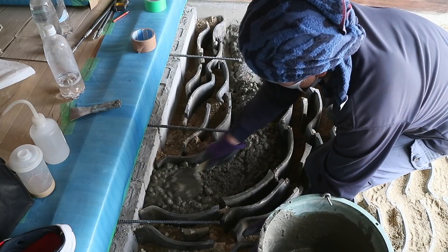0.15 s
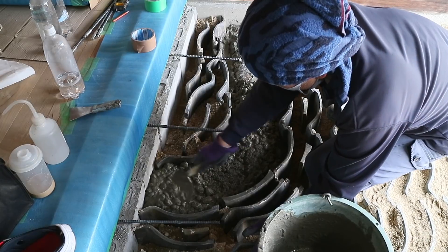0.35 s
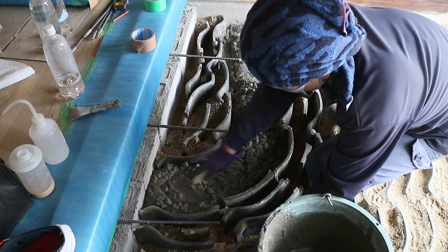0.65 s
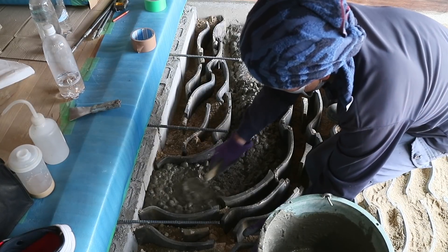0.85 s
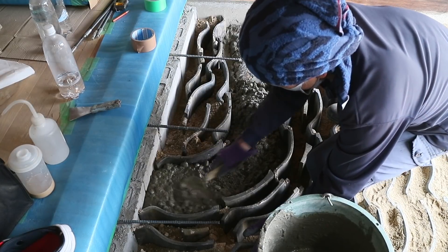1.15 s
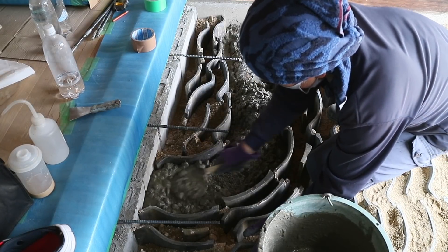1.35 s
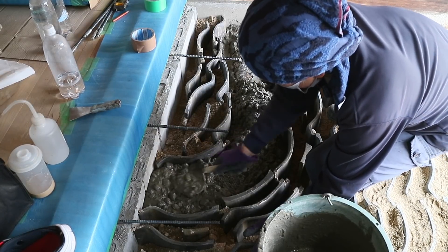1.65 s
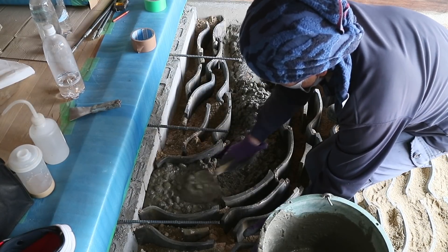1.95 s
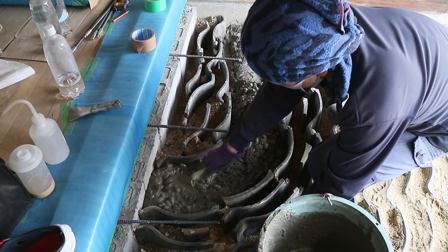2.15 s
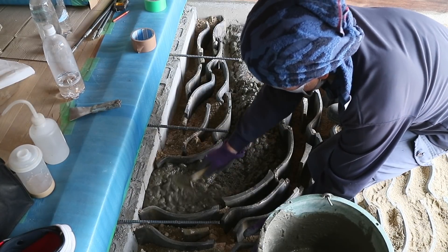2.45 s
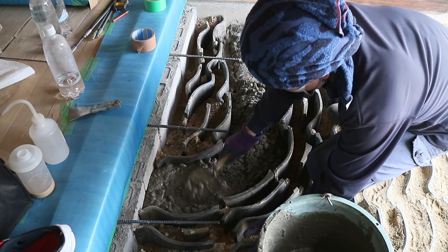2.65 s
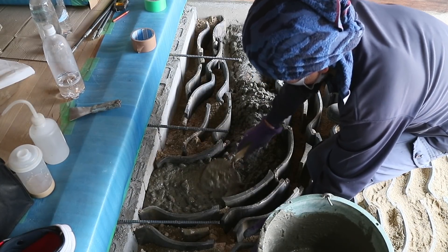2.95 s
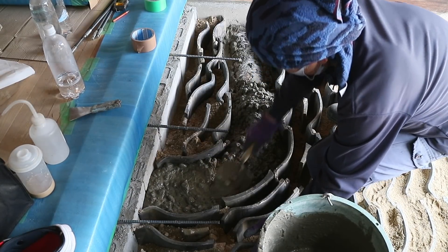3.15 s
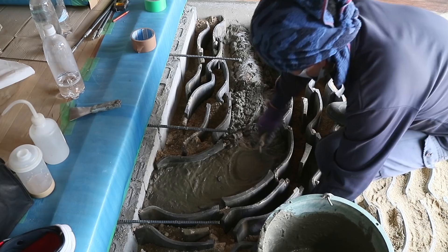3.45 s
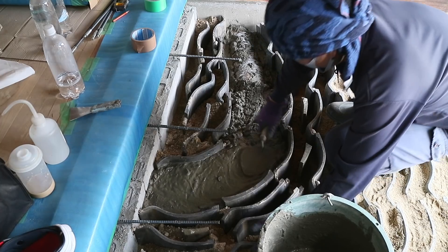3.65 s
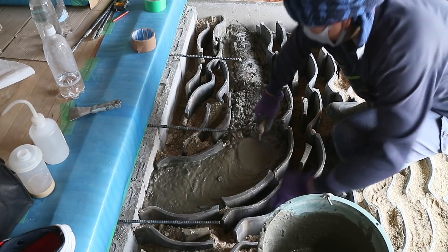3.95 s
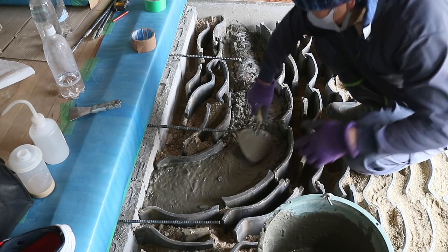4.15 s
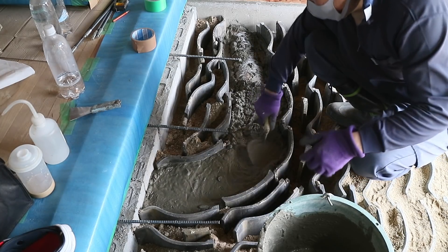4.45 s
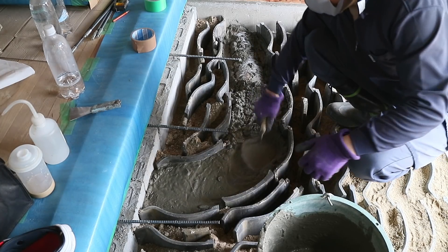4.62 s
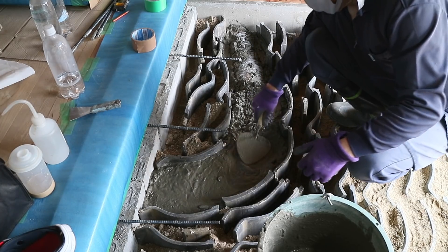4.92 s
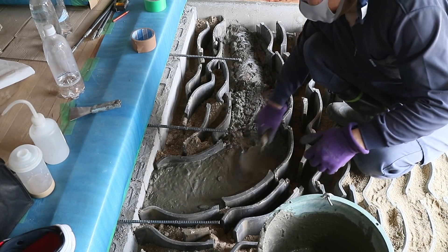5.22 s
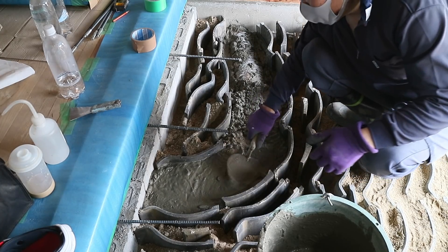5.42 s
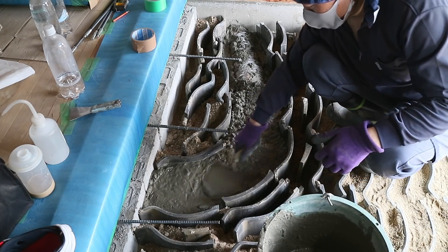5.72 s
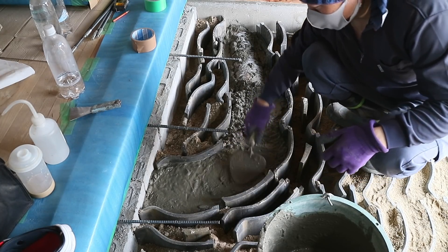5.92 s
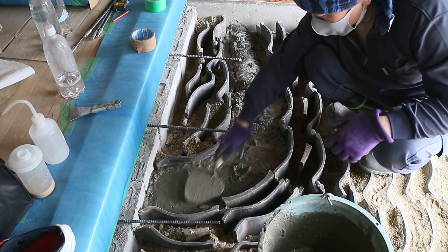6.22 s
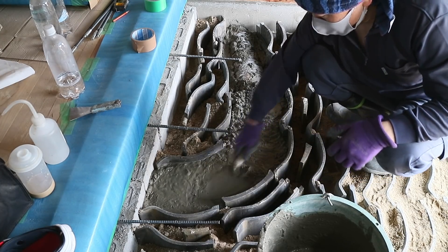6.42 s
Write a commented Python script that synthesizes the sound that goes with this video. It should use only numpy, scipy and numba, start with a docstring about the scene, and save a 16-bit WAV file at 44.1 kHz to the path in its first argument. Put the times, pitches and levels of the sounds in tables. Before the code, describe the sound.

A steel trowel works wet, sandy mortar very close to a pair of microphones. Quick irregular scrapes crunch and squelch, stones ringing against the blade, building to a dense, loud grind near three seconds. Then softer smears, a dull wet pat, near silence and a few sharp scraping catches. A faint far machine hums behind, in a dry half-open shed.

```python
"""Trowel on wet mortar

Close by, a steel trowel scrapes and pats wet, gritty cement between clay tiles in a half-open shed.
Sand grains are clumped noise ticks; they drive moving resonances for the pocket under the blade.
Filtered lumps make the mortar squelch; short decaying sines and noise make stones snag, grains snap
and lumps land. Behind it lie banded noise for the air of the site, a far machine's wavering sines,
a lumpy bass and a short noise tail for the shed, all heard through a pair of microphones."""
import sys
import numpy as np
from scipy import signal
from scipy.io import wavfile
from numba import njit

SR = 44100
rng = np.random.default_rng(int(sys.argv[2]) if len(sys.argv) > 2 else 0)


def master_out(mix):
    """Clip the mix to full scale and print it as 16-bit PCM to the path in sys.argv[1]."""
    frames = np.transpose(np.atleast_2d(mix))
    ceiling = np.clip(frames, -1, 1)
    pcm = np.round(ceiling * 32767).astype(np.int16)
    wavfile.write(sys.argv[1], SR, pcm)


N = 290178


def from_db(db):
    """Decibels to an amplitude factor."""
    return 10 ** (np.asarray(db) / 20)


def rms_one(x):
    """Scale a signal to rms 1."""
    return x / np.sqrt(np.mean(x ** 2) + 1e-20)


def at_hz(points, hz):
    """Read a spectrum table at a pitch, straight lines over log frequency."""
    points = np.array(points)
    return np.interp(np.log(hz), np.log(np.maximum(points[:, 0], 1)), points[:, 1])


def in_time(rows, axis=1):
    """Read one column of a timed table at every sample, straight lines between rows."""
    rows = np.array(rows)
    return np.interp(np.arange(N) / SR, rows[:, 0], rows[:, axis])


def filtered(x, order, hz, kind):
    """Butterworth filter along the last axis."""
    return signal.sosfilt(signal.butter(order, hz, kind, fs=SR, output="sos"), x)


def drift(rate):
    """Slow chance of spread 1: noise through two equal low-pass poles at rate (Hz)."""
    r = np.exp(-80 * np.pi * rate / SR)  # computed at every 40th sample
    slow = signal.lfilter([1], [1, -2 * r, r * r], rng.standard_normal(N // 40 + 2002))[2000:]
    return np.interp(np.arange(N) / 40, np.arange(len(slow)), rms_one(slow))


def random_moments(per_s, chances):
    """Random sample positions, with independent chances of 0 to 1 for each."""
    when, *rest = rng.random((int(per_s * N / SR), 1 + chances)).T
    return (when * (N - 1)).astype(int), *rest


def ring(clicks, hz, t60):
    """A unit click sets a two-pole resonance ringing as a sine of height 1."""
    r, w = np.exp(-np.log(1000) / (t60 * SR)), 2 * np.pi * hz / SR
    return signal.lfilter([0, np.sin(w)], [1, -2 * r * np.cos(w), r * r], clicks + 1e-18)


def grains(per_s, spread_db, clump_db):
    """Two trains of random ticks of uneven size that come in clumps; rms 1."""
    sizes = from_db(spread_db * np.minimum(rng.exponential(1, (2, N)), 5)) * rng.choice([-1, 1], (2, N))
    struck = rng.random((2, N)) < per_s / SR
    return rms_one(sizes * struck * from_db(clump_db * drift(39)))


def colour(pair, spectrum, side, patchy_db):
    """Bands 0.45 octave wide, each with its level, flicker and width; the pair gives mid and side."""
    out, edges = 0, 25 * 2 ** np.arange(0, 9.6, .45)
    for k, (low, high) in enumerate(zip(edges, edges[1:])):
        hz = np.sqrt(low * high)
        if hz > spectrum[0][0]:
            mid, wide = filtered(pair, 2, [low, high], "band")
            gain = from_db(at_hz(spectrum, hz) + patchy_db * drift(17.0)) * (-1) ** k
            out = out + gain * (mid + from_db(at_hz(side, hz)) * wide * [[1], [-1]])
    return out / np.sqrt(np.mean(out.mean(axis=0) ** 2))


# Relative density of the air of the site: pitch_hz, level_db (per Hz)
AIR_SPECTRUM = [(15, -43.5), (40, 7), (65, -6.5), (110, -2.5), (160, -15.5), (225, -6.5), (460, -5),
                (892, -10), (1100, -7), (1730, -16), (3730, -16), (7610, -29.5), (11300, -36.5),
                (14000, -53)]
# Stereo width of the air: pitch_hz, side_to_mid_db
AIR_WIDTH = [(60, -17), (180, 10.5), (550, 6), (1650, 5.5), (4970, 0.5), (15000, 6)]
AIR_DB = -62


def air():
    """The open air around the shed: noise shaped band by band, with a slight flicker in each."""
    return from_db(AIR_DB) * colour(rng.standard_normal((2, N)), AIR_SPECTRUM, AIR_WIDTH, patchy_db=1.5)


# Far machine: pitch_hz, level_db (rms, before it wavers)
MACHINE_HUM = [(84, -68), (126, -77), (168, -72)]


def hum():
    """A far machine: a few harmonics that waver in level and phase."""
    t, out = np.arange(N) / SR, 0
    for hz, db in MACHINE_HUM:
        level = np.sqrt(2) * from_db(db + 2 * drift(7))
        out = out + level * np.sin(2 * np.pi * hz * t + .8 * drift(3))
    return out


# Bass under the work: time_s, level_db (rms, before it flickers)
BASS_LEVEL = [(0.0, -56), (0.11, -47.5), (0.22, -70), (0.35, -46.5), (0.44, -67), (0.62, -52), (1.17, -60),
              (1.24, -52), (1.47, -68), (1.5, -49), (1.68, -75), (1.78, -51), (1.91, -61.5), (2.22, -45.5),
              (2.25, -58.5), (2.9, -48), (3.04, -67), (3.17, -50), (3.21, -58.5), (3.85, -52), (4.27, -70),
              (4.32, -56), (4.36, -53), (4.6, -61.5), (4.65, -52), (4.75, -68), (4.89, -47), (4.99, -77),
              (5.06, -59.5), (5.13, -82), (5.22, -55), (5.44, -66.5), (5.9, -51.5), (6.05, -73.5),
              (6.3, -78), (6.4, -47), (6.49, -61), (6.58, -49)]


def rumble():
    """Dull, lumpy band-passed noise in the bass, the same in both channels."""
    noise = filtered(rng.standard_normal(N), 3, [160.0, 265.0], "band")
    return from_db(in_time(BASS_LEVEL) + 1.8 * drift(7.1)) * rms_one(noise)


# One row per push or pat of the blade: peak_s, rise_s, fall_s, grit_db,
# low_ring_db, low_ring_hz, high_ring_db, high_ring_hz, squelch_db
BLADE_STROKES = [(0.07, 0.061, 0.05, -31.5, -40.5, 1700, -32, 2300, -37.5),
                 (0.218, 0.13, 0.15, -43, -43, 1750, -45, 2180, -50),
                 (0.347, 0.049, 0.036, -37.5, -61, 1240, -57, 2280, -38.5),
                 (0.507, 0.12, 0.068, -41.5, -42, 1510, -41.5, 2500, -41),
                 (0.592, 0.028, 0.036, -48, -40, 1720, -38.5, 2420, -46),
                 (0.642, 0.08, 0.048, -40, -58, 1730, -39, 3020, -42),
                 (0.742, 0.038, 0.037, -41, -49, 1530, -36.5, 3180, -43.5),
                 (0.778, 0.034, 0.043, -38, -37.5, 1650, -33.5, 2580, -41.5),
                 (0.81, 0.039, 0.04, -41.5, -35, 1620, -41, 2500, -40.5),
                 (0.895, 0.047, 0.1, -38.5, -43.5, 1430, -43, 3080, -42),
                 (0.925, 0.04, 0.025, -46, -55, 1520, -28, 3190, -60),
                 (1.056, 0.077, 0.018, -44, -57, 1810, -39, 2620, -52),
                 (1.116, 0.09, 0.039, -34.5, -53, 1380, -43, 2350, -38),
                 (1.181, 0.03, 0.083, -37, -35, 1870, -37, 3100, -42.5),
                 (1.252, 0.029, 0.051, -33, -37.5, 1430, -41, 2100, -36.5),
                 (1.406, 0.092, 0.034, -36, -39, 1230, -40, 2650, -42),
                 (1.537, 0.082, 0.038, -34, -32, 1500, -40, 3200, -37.5),
                 (1.651, 0.055, 0.055, -38, -36, 1490, -44, 2220, -44.5),
                 (1.797, 0.075, 0.057, -37.5, -43.5, 1320, -49, 2260, -39),
                 (1.893, 0.017, 0.16, -44.5, -65, 1340, -61, 2280, -48.5),
                 (1.93, 0.0064, 0.027, -36, -38, 1750, -41, 2250, -42),
                 (1.974, 0.055, 0.036, -33, -30.5, 1970, -33.5, 2720, -41.5),
                 (2.005, 0.037, 0.046, -35.5, -35.5, 1620, -44, 2200, -37.5),
                 (2.081, 0.019, 0.026, -34, -25.5, 1680, -34, 2200, -38),
                 (2.159, 0.092, 0.066, -33.5, -43, 1530, -40.5, 2150, -38.5),
                 (2.313, 0.095, 0.039, -37, -63, 1380, -40, 2370, -42),
                 (2.35, 0.031, 0.034, -55, -43, 1450, -52, 2200, -44),
                 (2.443, 0.12, 0.065, -33.5, -33.5, 1400, -42, 2140, -38.5),
                 (2.545, 0.042, 0.085, -43.5, -33.5, 1500, -42, 2970, -44.5),
                 (2.632, 0.054, 0.11, -30.5, -31.5, 1820, -38.5, 2600, -39),
                 (2.696, 0.066, 0.057, -34, -21.5, 1470, -32, 2460, -46),
                 (2.755, 0.035, 0.031, -34.5, -29, 1350, -38, 2020, -38),
                 (2.79, 0.006, 0.028, -35.5, -27, 1500, -45, 2100, -51),
                 (2.848, 0.043, 0.062, -31, -24.5, 1530, -33, 2530, -56),
                 (2.916, 0.083, 0.11, -33, -28, 1260, -36, 2050, -36),
                 (2.972, 0.033, 0.042, -34, -28.5, 1490, -24.5, 1975, -37),
                 (3.005, 0.04, 0.033, -29, -34, 1440, -32.5, 3200, -48),
                 (3.135, 0.049, 0.063, -34, -33, 1300, -34, 2260, -42),
                 (3.255, 0.42, 0.031, -41.5, -44, 880, -59, 2540, -47),
                 (3.35, 0.11, 0.29, -63, -50, 1000, -58, 2050, -46),
                 (3.467, 0.02, 0.059, -43.5, -41.5, 1300, -48, 2220, -44.5),
                 (3.557, 0.025, 0.04, -40, -37.5, 1130, -42, 2040, -44.5),
                 (3.654, 0.036, 0.057, -41.5, -42, 1470, -51, 2180, -46.5),
                 (3.753, 0.028, 0.03, -43.5, -51, 1350, -63, 2970, -44),
                 (3.815, 0.021, 0.26, -46.5, -47, 1190, -71, 2200, -49.5),
                 (3.957, 0.053, 0.01, -44.5, -66, 1380, -46.5, 3070, -44),
                 (4.019, 0.024, 0.13, -47.5, -53, 1400, -64, 2580, -50.5),
                 (4.319, 0.0019, 0.24, -47, -48, 1750, -60, 2400, -44.5),
                 (4.335, 0.015, 0.073, -44, -34, 1790, -36.5, 2430, -55),
                 (4.414, 0.041, 0.051, -38, -60, 1430, -61, 2540, -64),
                 (4.617, 0.0059, 0.046, -39.5, -53, 1350, -50, 3000, -43.5),
                 (4.664, 0.096, 0.063, -42.5, -45.5, 1380, -46, 3010, -45.5),
                 (4.785, 0.044, 0.18, -49.5, -48, 990, -80, 3060, -52.5),
                 (4.882, 0.059, 0.032, -43.5, -47, 1070, -67, 2880, -48),
                 (5.187, 0.0026, 0.042, -30.5, -29, 1570, -36, 2300, -38),
                 (5.209, 0.0066, 0.039, -32, -30, 1420, -44, 2340, -45),
                 (5.284, 0.074, 0.12, -41, -39.5, 1280, -47, 2300, -41),
                 (5.433, 0.0072, 0.16, -48.5, -50.5, 1270, -72, 3230, -53),
                 (5.566, 0.023, 0.056, -46.5, -30, 1380, -74, 2170, -54),
                 (5.612, 0.036, 0.054, -37.5, -31, 912, -38, 2900, -39.5),
                 (5.652, 0.039, 0.038, -38, -38.5, 890, -34, 2100, -55),
                 (5.69, 0.032, 0.044, -48, -36.5, 1340, -60, 2500, -46.5),
                 (5.775, 0.057, 0.093, -50, -39.5, 1400, -43, 3030, -42),
                 (5.887, 0.3, 0.085, -39, -64, 1640, -41, 3020, -51),
                 (5.959, 0.023, 0.065, -59, -46.5, 1390, -54.5, 3000, -52.5),
                 (6.323, 0.0023, 0.089, -36, -39, 970, -45, 2630, -58),
                 (6.38, 0.021, 0.095, -45, -33, 1570, -44, 3190, -41),
                 (6.46, 0.049, 0.11, -30.5, -33.5, 1480, -37, 2100, -48),
                 (6.515, 0.01, 0.25, -40, -54, 1420, -61, 2200, -42.5)]
# A stroke is this far under its peak one rise before and one fall after it; 1 = pointed, 2 = domed
EDGE_DB, ROUNDNESS = 12, 1.5
SETTLE_DB, SETTLE_DB_PER_S = -45, 74.5  # the mortar goes on settling after each stroke
TOUCH_RISES = 1.45  # the blade touches down this many rises before the peak; the stroke is silent earlier


def stroke_controls():
    """Every stroke swells, fades and settles by one rule; powers add, and the loudest ring sets the pitch."""
    columns = np.transpose(BLADE_STROKES)[:, :, None]
    peak_s, rise_s, fall_s, grit_db, low_db, low_hz, high_db, high_hz, squelch_db = columns
    t = np.arange(0, N / SR + .001, .001)
    since = t - peak_s
    away = np.abs(since) / np.maximum(np.where(since < 0, rise_s, fall_s), .002)
    swell = from_db(-EDGE_DB * np.minimum(away, 8) ** ROUNDNESS)
    touch = np.clip(3 * (since / rise_s + TOUCH_RISES), 0, 1)
    settling = (since > 0) * from_db(SETTLE_DB - SETTLE_DB_PER_S * np.abs(since)) ** 2
    power = swell ** 2 * touch ** 2 + settling + 1e-12

    def level(db):
        return 10 * np.log10(np.sum(power * from_db(db) ** 2, axis=0))

    def pitch(hz, db):
        weight = (power * from_db(db) ** 2) ** 2
        return np.sum(weight * hz, axis=0) / np.sum(weight, axis=0)

    low, high = (level(low_db), pitch(low_hz, low_db)), (level(high_db), pitch(high_hz, high_db))
    controls = level(grit_db), *low, *high, level(squelch_db)
    return [np.interp(np.arange(N) / SR, t, c) for c in controls]


# Stereo width of the blade's work: pitch_hz, side_to_mid_db
WORK_WIDTH = [(120, -13), (250, -38.5), (500, -2.5), (1200, -14.5), (2500, -2), (5000, -1), (10000, -1.5)]


def widen(pair, hz):
    """Mid and side to left and right, with the width found at one pitch."""
    return pair[0] + from_db(at_hz(WORK_WIDTH, hz)) * pair[1] * [[1], [-1]]


# Relative density of the gritty scrape: pitch_hz, level_db (per Hz)
GRIT_SPECTRUM = [(450, -22), (800, -3), (1500, 8), (2400, 1.5), (3500, -2), (5000, -5), (7500, -10.5),
                 (10500, -15), (13000, -33), (15800, -56)]


def crunch(cycles):
    """Coarse wet grains crack in short bursts, each pitch band ringing for a few cycles."""
    out = 0
    for hz in np.geomspace(500, 9000, num=18):
        cracks = grains(400, spread_db=1.0, clump_db=-2.0) * from_db(3.7 * drift(15))
        pair = rms_one(ring(cracks, hz, cycles / hz)) * np.sqrt(hz)  # equal bands in pitch grow with hz
        out = out + from_db(at_hz(GRIT_SPECTRUM, hz)) * widen(pair, hz)
    return rms_one(out)


# Treble of the scrape: time_s, level_db
TREBLE_LEVEL = [(0, -7.5), (0.5, 3.5), (1, -0.5), (1.5, -5.5), (2, -2), (2.5, -5.5), (3, -4), (3.5, 2),
                (4, 5.5), (4.4, -2.5), (4.8, 4.5), (5.2, 2), (5.5, 1), (5.9, 4.5), (6.3, -2.5), (6.58, 2)]
TREBLE_HZ = 6300


def scrape(grit_db):
    """Fine sand ticks and coarse crunch follow the strokes, with the treble rising and dipping."""
    sand = colour(grains(6000, spread_db=2.5, clump_db=0.5), GRIT_SPECTRUM, WORK_WIDTH, patchy_db=4.0)
    grit = sand + from_db(-5) * crunch(cycles=17.4)
    treble = filtered(grit, 1, TREBLE_HZ, "high")
    return from_db(grit_db) * (grit + (from_db(in_time(TREBLE_LEVEL)) - 1) * treble)


@njit
def sweep(x, cosine, r):
    """A resonance whose centre and width move from sample to sample."""
    y = np.zeros_like(x)
    for i in range(2, len(x)):
        y[i] = (1 - r[i] ** 2) * (x[i] - x[i - 2]) / 2 + 2 * r[i] * cosine[i] * y[i - 1] - r[i] ** 2 * y[i - 2]
    return y


WOBBLE_SHARE, WOBBLE_PER_S = 0.027, 16.4  # the hand's tilt never holds still


def pocket(clicks, ring_hz, sharpness):
    """Grains ring the gap between blade and mortar, whose pitch follows the blade's tilt."""
    ring_hz = ring_hz * (1 + WOBBLE_SHARE * drift(WOBBLE_PER_S))
    width_hz = ring_hz / np.clip(sharpness, 1.5, 9)
    cosine, r = np.cos(2 * np.pi * ring_hz / SR), np.exp(-np.pi * width_hz / SR)
    pair = np.array([sweep(sweep(row, cosine, r), cosine, r) for row in clicks])
    return widen(pair / np.sqrt(width_hz * np.pi / 2 / SR), 890.0)  # same power at every width


# How tightly the mortar closes the pocket: time_s, added_sharpness
POCKET_SEAL = [(0, -4), (0.7, -5), (0.95, 6), (1.2, -1), (1.9, -2), (2.1, -1.5), (2.3, 6), (2.4, 6.5),
               (2.55, -1), (2.65, -1.5), (2.85, -3), (3.1, -3), (3.3, 0), (3.8, -2.5), (4.25, -13),
               (4.34, -2), (4.42, 6.5), (5.2, -2.5), (5.4, -3), (5.57, -3.5), (5.7, -0.5), (6.35, 2.5),
               (6.58, 3)]
# Sharpness is pitch over width of each resonance, here at a ring of -39 dB
LOW_SHARPNESS, HIGH_SHARPNESS, SHARPER_PER_DB = 2.6, 2.75, 0.33


def pocket_rings(gravel, low_db, low_hz, high_db, high_hz):
    """The pocket's low and high resonances, each sharper when it rings louder; the seal shapes the low one."""
    low_sharpness = LOW_SHARPNESS + in_time(POCKET_SEAL) + SHARPER_PER_DB * (low_db + 39)
    high_sharpness = HIGH_SHARPNESS + SHARPER_PER_DB * (high_db + 39)
    low = from_db(low_db) * pocket(gravel, low_hz, low_sharpness)
    return low + from_db(high_db) * pocket(gravel[:, ::-1].copy(), high_hz, high_sharpness)


# Thin third ring near the blade's tip: time_s, pitch_hz, level_db (over the grit)
TIP_RING = [(0.0, 3950, -12), (0.99, 4080, -4.5), (1.06, 5030, -10.5), (1.19, 4030, -10), (1.41, 4300, -16),
            (1.89, 4160, -14), (1.91, 4700, -10.5), (2.33, 4150, -20), (2.46, 4900, -17),
            (2.64, 4030, -13.5), (2.86, 4630, -11), (3.01, 3650, -11), (3.11, 4800, -26), (3.45, 4100, -27),
            (3.88, 4700, -15), (3.94, 4150, -12), (5.11, 4380, -13), (5.13, 4620, -5.5),
            (5.55, 3990, -16.5), (5.72, 4600, -16), (5.83, 4030, -11.5), (5.88, 4700, -12.5),
            (6.17, 4040, -11), (6.3, 4800, -8), (6.41, 4130, -8.5), (6.58, 4470, -16)]
THIN_SHARPNESS, THIN_FLICKER_DB = 7.7, 2.5


def thin_ring(gravel, grit_db):
    """A narrow resonance near the blade's tip moves in pitch and flickers in level over the grit."""
    level_db = grit_db + in_time(TIP_RING, axis=2) + THIN_FLICKER_DB * drift(36)
    shifted = np.roll(gravel, N // 3, axis=1)
    return from_db(level_db) * pocket(shifted, in_time(TIP_RING), THIN_SHARPNESS)


# Resonances of the mortar bed: pitch_hz, width_hz, level_db
MORTAR_BED = [(208, 110, -8), (300, 150, -9.5), (415.8, 60, -1.5), (534, 62, 0.5), (654, 90, 2.5),
              (813, 100, 4), (987, 172, 3)]


def squelch():
    """Soft, sparse lumps shift in the bed and sound its dull resonances."""
    lumps, pair = grains(900, spread_db=-1.0, clump_db=0.5), 0
    for k, (hz, width, db) in enumerate(MORTAR_BED):
        pair = pair + from_db(db + 2 * drift(4)) * (-1) ** k * rms_one(ring(lumps, hz, 2.2 / width))
    return widen(rms_one(filtered(pair, 2, 150.0, "high")), 400.0)


PEBBLES_PER_S = 8  # for each of the two rings
PEBBLE_DB, PEBBLE_STEEL_DB, PEBBLE_SPREAD_DB = 2.5, -1.5, 4.5  # over the ring and over the grit of the moment


def pebbles(grit_db, ring_db, ring_hz):
    """Small stones at random moments follow the strokes' level and ring pitch; rows like BIG_STONES."""
    at, size = random_moments(PEBBLES_PER_S, 1)
    extra_db = PEBBLE_SPREAD_DB * (2 * size - 1)
    return np.c_[at / SR, ring_db[at] + PEBBLE_DB + extra_db, ring_hz[at],
                 grit_db[at] + PEBBLE_STEEL_DB + extra_db]


# Big stones catch the edge: start_s, level_db, pitch_hz, steel_db
BIG_STONES = [(0.036, -25, 2400, -30), (0.335, -22, 1250, -46), (0.585, -15, 2490, -50),
              (0.736, -27, 3180, -35), (0.771, -6, 2510, -36), (0.904, -19, 3180, -24),
              (1.051, -26, 2380, -29), (1.243, -33, 1840, -30), (1.676, -14.5, 1860, -50),
              (1.891, -22, 2300, -45), (1.927, -29, 1670, -40), (2.067, -11, 1700, -46),
              (2.076, -13, 1600, -45), (2.133, -14, 1430, -43), (2.34, -24, 1420, -43),
              (2.496, -19, 1440, -49), (2.544, -18, 1540, -45), (2.577, -16.5, 1480, -45),
              (2.621, -15, 1560, -42), (2.677, -13, 1650, -28), (2.694, -12, 1540, -39),
              (2.731, -25, 1500, -35), (2.785, -14, 1450, -33), (2.808, -4, 1550, -42),
              (2.8215, -1, 1490, -35), (2.8305, 0, 1560, -24), (2.837, -3, 1500, -28),
              (2.847, -4.5, 1565, -22), (2.888, -10, 1360, -29), (2.9565, -8, 1406, -30),
              (2.988, -6.5, 1460, -26), (3.1155, -13, 1500, -35), (3.132, -8.5, 1475, -33),
              (3.256, -30, 885, -55), (3.263, -25.5, 925, -55), (3.538, -19.5, 1350, -56),
              (3.723, -32, 1120, -48), (3.747, -27, 1390, -51), (4.211, -26, 4470, -48),
              (4.329, -16.5, 1750, -38), (4.365, -20, 1786, -37), (4.615, -25, 1350, -51),
              (4.812, -34, 700, -41), (4.848, -32, 1060, -50), (4.88, -23, 923, -46),
              (5.184, -12, 1660, -15), (5.188, -11.5, 2300, -27), (5.207, -7.5, 1404, -32),
              (5.213, -27, 1440, -40), (5.222, -11.5, 2320, -43), (5.245, -23, 1510, -45),
              (5.558, -31, 1390, -54), (5.563, -16, 1320, -51), (5.573, -17, 1286, -46),
              (5.58, -18, 1160, -47), (5.887, -8, 4840, -39), (6.323, -17, 2610, -34.5),
              (6.374, -15, 1610, -27), (6.448, -9, 2060, -38), (6.466, -18, 2100, -27)]
# Modes of the wet steel blade: pitch_hz, level_db, t60_s
BLADE_MODES = [(1650, -7, 0.033), (2420, -9, 0.024), (3230, -1, 0.021), (4170, -13.5, 0.022),
               (4980, -8, 0.018), (6570, -16, 0.022)]
SNAG_CYCLES, SNAG_RISE_S = 27.4, 0.0014  # cycles to die 60 dB; swell over the first cycles


def snags(stones):
    """A stone rings the pocket at its own pitch; cracks and sounds the wet steel by its steel level."""
    t = np.arange(int(.05 * SR)) / SR
    out, strengths = np.zeros(N), rng.normal(0, 3, (len(stones), len(BLADE_MODES)))
    cracks = signal.lfilter([1], [1, -.7], rng.standard_normal((len(stones), len(t))))
    cracks *= from_db(-18.5 - 60 * t / 0.0038)
    for (s, db, hz, steel_db), chance, steel in zip(stones, strengths, cracks):
        for (mode_hz, mode_db, t60), extra_db in zip(BLADE_MODES, chance):
            steel = steel + np.sin(2 * np.pi * mode_hz * t) * from_db(mode_db + extra_db - 60 * t / t60)
        sound = np.sin(2 * np.pi * hz * t) * from_db(db - 60 * t * hz / SNAG_CYCLES)
        sound *= 1 - np.exp(-(t / SNAG_RISE_S) ** 2)
        sound += from_db(steel_db) * steel * (1 - np.exp(-t / .0003))
        at = round(s * SR)
        out[at:at + len(t)] += sound[:N - at]
    return filtered(out, 2, [500, 9000], "band")


# Grains crushed under the edge: start_s, level_db, pitch_hz
CRUSHED_GRAINS = [(0.155, -37, 2710), (0.1965, -41, 2730), (0.3351, -43, 2520), (0.4304, -40, 3170),
                  (0.624, -40, 2930), (0.7449, -20, 3070), (0.8932, -25, 3150), (0.9147, -17.5, 3300),
                  (1.0296, -30, 3230), (1.0906, -30, 2760), (1.1056, -23, 4400), (1.1633, -31, 2630),
                  (1.242, -21, 3900), (1.2476, -29, 3750), (1.4735, -33, 2980), (1.5165, -22, 3470),
                  (1.7596, -36, 2450), (1.8911, -32, 3930), (1.9275, -40, 2790), (1.954, -30, 2620),
                  (1.9644, -25, 2600), (1.994, -23, 2860), (2.076, -37, 2500), (2.5965, -33, 2680),
                  (2.8416, -17, 2580), (2.9635, -33, 2650), (2.991, -18, 3250), (3.4604, -35, 2880),
                  (3.6346, -44, 2670), (3.8114, -37, 3260), (3.9544, -34, 3160), (4.5301, -48, 2700),
                  (4.614, -40, 2840), (4.7646, -40, 2600), (4.812, -37, 3680), (4.8819, -29.5, 4900),
                  (5.1894, -16.5, 4600), (5.4306, -39, 3300), (5.586, -31, 3220), (5.6217, -27, 2720),
                  (5.6428, -23, 2500), (5.7633, -27, 3170), (6.4225, -26.5, 3900), (6.466, -25, 3140),
                  (6.482, -24, 2640), (6.504, -33, 2550)]
FLECK_CYCLES, FLECK_SNAP_DB, FLECK_SNAP_T60_S = 52, -7, 0.0057  # cycles to die 60 dB; noise of the snap
FLECKS_PER_S, FLECK_DB, FLECK_SPREAD_DB = 30, 1, 3  # smaller ones at random, over the grit of the moment


def flecks(grit_db):
    """A crushed grain snaps and rings briefly and brightly, with separate snap noise in each channel."""
    at, size, pitch = random_moments(FLECKS_PER_S, 2)
    small_db = grit_db[at] + FLECK_DB + FLECK_SPREAD_DB * (2 * size - 1)
    rows = np.vstack([CRUSHED_GRAINS, np.c_[at / SR, small_db, 2500 * 2.6 ** pitch]])
    t = np.arange(int(.012 * SR)) / SR
    out, snaps = np.zeros((2, N)), rng.standard_normal((len(rows), 2, len(t) + 1))
    for (s, db, hz), snap in zip(rows, np.diff(snaps) / 2):
        sound = np.sin(2 * np.pi * hz * t) * from_db(-60 * t * hz / FLECK_CYCLES)
        sound = sound + snap * from_db(FLECK_SNAP_DB - 60 * t / FLECK_SNAP_T60_S)
        at = round(s * SR)
        out[:, at:at + len(t)] += from_db(db) * sound[:, :N - at]
    return filtered(out, 2, 7500, "low")


# Single hard grains crack dry against the steel: start_s, level_db
HARD_GRAINS = [(0.3338, -26), (1.0283, -27), (1.0424, -26), (1.053, -27), (1.087, -23), (1.2419, -18),
               (1.2474, -23), (1.9293, -18), (2.8384, -19), (2.9635, -28), (2.9833, -25), (3.1093, -19.5),
               (4.8804, -26), (5.185, -22), (5.4306, -35), (5.885, -18), (6.322, -23), (6.4207, -24)]
TICKS_PER_S, TICK_DB, TICK_SPREAD_DB = 60, -0.5, 2  # smaller ones at random, over the grit of the moment
TICK_HZ, TICK_T60_S, TICK_SIDE_DB = 3300, 0.0025, -3.5  # band centre, decay and width of all
TICK_CLICK_DB = 15  # the first crack against the rattle, before the band filter


def ticks(grit_db):
    """A sharp click with a very short bright rattle behind it."""
    at, size = random_moments(TICKS_PER_S, 1)
    small_db = grit_db[at] + TICK_DB - TICK_SPREAD_DB * np.log(size + .03)
    rows = np.vstack([HARD_GRAINS, np.c_[at / SR, small_db]])
    t = np.arange(int(.006 * SR)) / SR
    pair = np.zeros((2, N))
    rattles = rng.standard_normal((len(rows), 2, len(t))) * from_db(-60 * t / TICK_T60_S)
    rattles[:, 0, 0] = from_db(TICK_CLICK_DB) * np.sign(rattles[:, 0, 0])
    for (s, db), rattle in zip(rows, rattles):
        at = round(s * SR)
        pair[:, at:at + len(t)] += from_db(db) * rattle[:, :N - at]
    pair = filtered(pair, 3, [TICK_HZ / 2, TICK_HZ * 2], "band")
    return pair[0] + from_db(TICK_SIDE_DB) * pair[1] * [[1], [-1]]


# Lumps land on the bed: start_s, level_db, pitch_hz, boom_db (over the blow)
LANDING_LUMPS = [(4.318, -14, 443, -5), (4.384, -33, 377, -12), (5.0415, -36.5, 632, -7),
                 (5.055, -44, 630, -3), (5.068, -47, 686, -12), (5.096, -48, 450, -14.5)]
THUMP_T60_S, BOOM_HZ, BOOM_T60_S = 0.029, 230, 0.045
SPLAT_DB, SPLAT_T60_S = -9.5, 0.089  # dull wet noise of a landing lump


def slaps():
    """A soft blow: a damped thump and its octave, a wet splat, a low boom of the bed."""
    out, t = np.zeros(N), np.arange(int(.1 * SR)) / SR
    splats = filtered(rng.standard_normal((len(LANDING_LUMPS), len(t))), 3, [230, 850], "band")
    for (s, db, hz, boom_db), splat in zip(LANDING_LUMPS, rms_one(splats)):
        blow = np.sin(2 * np.pi * hz * t) * from_db(-60 * t / THUMP_T60_S)
        blow += splat * from_db(SPLAT_DB - 60 * t / SPLAT_T60_S)
        blow -= np.sin(2 * np.pi * 2.0 * hz * t) * from_db(-13 - 60 * t / 0.011)
        blow += np.sin(2 * np.pi * BOOM_HZ * t) * from_db(boom_db - 60 * t / BOOM_T60_S)
        at = round(s * SR)
        out[at:at + len(t)] += from_db(db) * blow * (1 - np.exp(-t / .001))
    return filtered(out, 2, 160, "high")


# Where the blade works before the microphones: time_s, left_over_right_db
BLADE_PLACE = [(0, 0), (2.6, 0.2), (3.2, -1), (5.8, -0.5), (6.58, -0.5)]


def placed(near):
    """A level difference between the channels moves the work from side to side."""
    return near * from_db(np.outer([.5, -.5], in_time(BLADE_PLACE)))


SHED_T60_S, SHED_DB = 0.083, -11


def shed(x):
    """The half-open shed: a thin tail of noise that dies away, its own in each channel."""
    t = np.arange(int(.5 * SR)) / SR
    tail = rng.standard_normal((2, len(t))) * from_db(-60 * t / SHED_T60_S) * (t > .006)
    tail = filtered(tail, 1, [300.0, 5000.0], "band")
    return signal.fftconvolve(x, tail / np.sqrt(np.sum(tail[0] ** 2)), axes=1)[:, :N]


def scene():
    """The strokes drive the near sounds; the shed answers them, over air, hum and bass."""
    grit_db, low_db, low_hz, high_db, high_hz, squelch_db = stroke_controls()
    grit = scrape(grit_db) + flecks(grit_db) + ticks(grit_db)
    gravel = grains(800, spread_db=1.0, clump_db=0.7)
    rings = pocket_rings(gravel, low_db, low_hz, high_db, high_hz) + thin_ring(gravel, grit_db)
    wet = from_db(squelch_db) * squelch()
    small_stones = pebbles(grit_db, low_db, low_hz), pebbles(grit_db, high_db, high_hz)
    stones = np.vstack([BIG_STONES, *small_stones])
    near = placed(grit + rings + wet + snags(stones) + slaps())
    return near + from_db(SHED_DB) * shed(near) + air() + hum() + rumble()


CUTOFF_HZ = 15800


def record(dry):
    """The microphones drop the deep bass; the top is cut steeply."""
    dry = filtered(dry, 3, 60.0, "high")
    return signal.sosfilt(signal.cheby2(12, 70, CUTOFF_HZ * 1.04, fs=SR, output="sos"), dry)


dry = scene()
out = record(dry)
master_out(out)
```